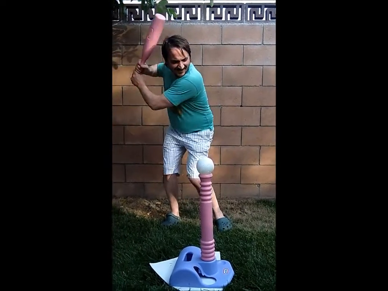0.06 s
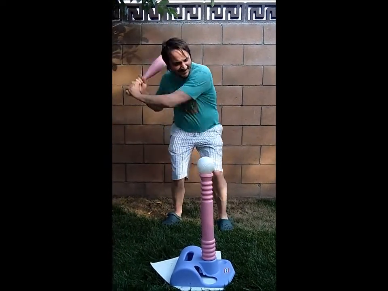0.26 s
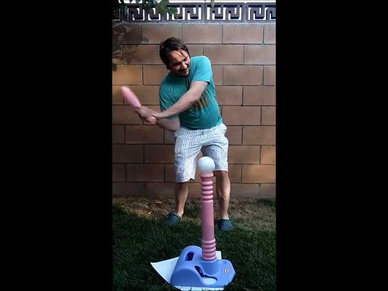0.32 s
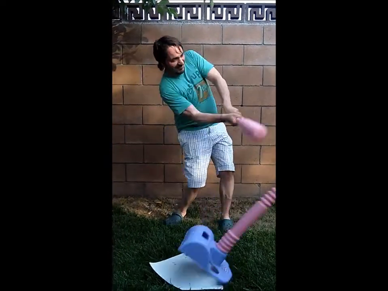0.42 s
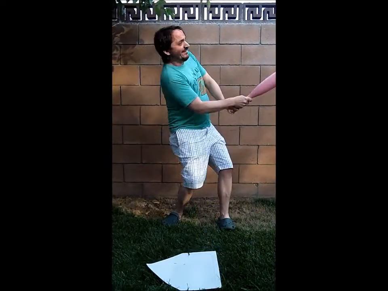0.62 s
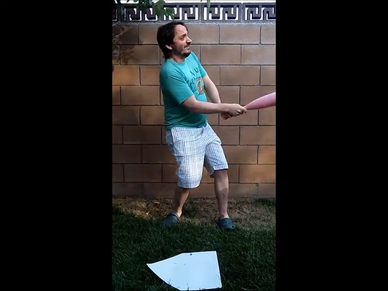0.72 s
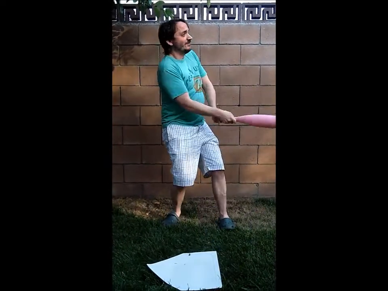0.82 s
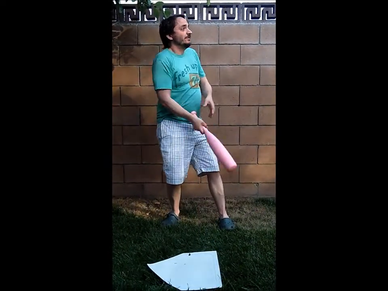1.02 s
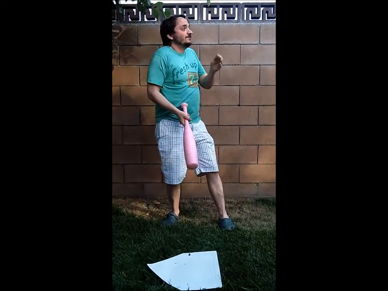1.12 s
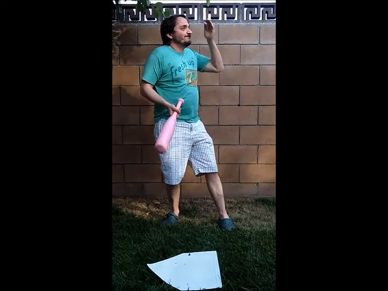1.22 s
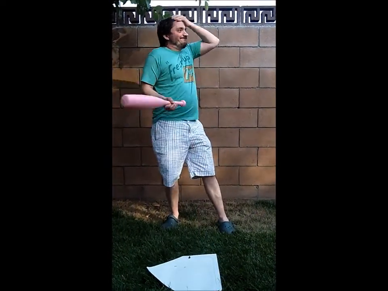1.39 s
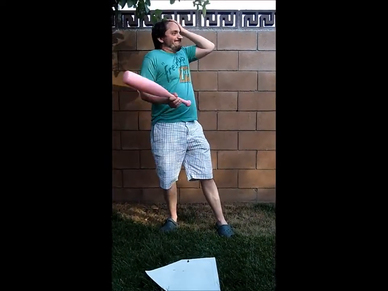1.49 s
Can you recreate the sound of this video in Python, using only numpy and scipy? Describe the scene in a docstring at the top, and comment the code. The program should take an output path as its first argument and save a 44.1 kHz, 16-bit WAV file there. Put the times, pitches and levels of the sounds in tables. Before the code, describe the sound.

One loud crack of a plastic bat hitting a ball and tee, over faint distant traffic.

```python
"""A walled backyard, distant town noise behind. The air of a swing buffets the microphone and the
recorder clicks faintly. A hollow plastic bat cracks into a ball and its tee; wall and houses answer.
The crack overloads the recorder, whose gain control ducks the town and lets it creep back.
Farther off, plastic clatters faintly as the struck things come down out of sight."""
import sys
import numpy as np
from scipy import signal
from scipy.fft import rfft, irfft
from scipy.io import wavfile
from scipy.ndimage import uniform_filter1d

SR = 44100
rng = np.random.default_rng(int(sys.argv[2]) if len(sys.argv) > 2 else 0)


def store_pcm(level_fs):
    """Save levels as 16-bit WAV."""
    pcm = np.round(np.clip(level_fs, -1, 1) * 32767).astype(np.int16)
    wavfile.write(sys.argv[1], SR, np.atleast_2d(pcm).T)


N = 68355
BAT_S = .409   # bat meets ball


def bat():
    """The blow sets the hollow bat ringing; its shell's dense small modes add a short bright snap."""
    # modes of the hollow bat: f/Hz, level/dB, t60/s
    modes = [(314, -18, .07), (500, -11, 0.039), (747, -6, .115), (1480, -11, 0.0703), (1757.1, -6, .06),
             (2120, -11, .05), (2667, -9, 0.044), (2800.2, -12, .035), (3258, -7.5, .035), (3765, -14, .03),
             (4185, -12, 0.034), (4433, -16, .03), (5070, -18, 0.029)]
    # spectrum of the snap: f/Hz, level/dB
    snap_colour = [(200, -8.5), (600, -1), (1500, -1), (3000, -1), (4500, -4), (6000, -8.5), (8000, -24),
                   (11000, -15), (16000, -28)]
    snap = from_db(-6) * noise(snap_colour) * dying(t60=.026)
    return through(contact(BAT_S, db=16.5, contact_s=.00006), ring(modes) + snap)


def tee():
    """The tee is knocked over: a lower, hollow knock just after the bat's."""
    # modes of the hollow tee: f/Hz, level/dB, t60/s
    modes = [(619.9, -15, .11), (1119.1, -4.5, .04), (1241.6, -6.5, 0.032), (1561, -19, 0.15),
             (2500, -21, .07)]
    return through(contact(.4134, db=18, contact_s=.00016), ring(modes))


def yard(crack):
    """The wall behind the batter answers once; near things scatter briefly, far houses faintly, longer."""
    # spectrum of the near echoes: f/Hz, level/dB
    near_colour = [(150, -12), (400, -2.5), (800, 0.5), (1500, 0.5), (3000, -4.5), (5000, -14.5),
                   (8000, -26), (11000, -31), (16000, -37.5)]
    # spectrum of the echoes off the houses: f/Hz, level/dB
    far_colour = [(150, -9), (700, -3), (1500, 1), (2800, 1.5), (5000, -12), (8000, -27), (16000, -39.5)]
    near = echoes(near_colour, db=6.5, t60=.173, build_s=.0073)
    far = echoes(far_colour, db=-14.5, t60=.6244, build_s=.03)
    wall = from_db(-17) * delayed(crack, .021)
    return wall + delayed(near + far, BAT_S)


def air():
    """Right at the microphone: low turbulence, and eddies that each push and swing back."""
    # strength of the moving air: t/s, level/dB
    strength = [(0, -39), (.19, -40), (0.269, -21.5), (0.337, -13.5), (.385, -14), (.405, -22.5),
                (.45, -11.5), (.52, -17), (.6, -22), (.8, -30), (.93, -36.5), (1.24, -35), (1.31, -26.5),
                (1.4, -35), (1.55, -34.5)]
    # spectrum of the turbulence: f/Hz, level/dB
    colour = [(20, -9.5), (40, -4), (70, 2), (140, -1.5), (220, -11.5), (350, -22), (600, -38), (1200, -58),
              (4000, -86)]
    # eddies that thump the microphone: t/s, level/dB, f/Hz
    eddies = [(0.041, -13.5, 109.7), (0.2833, -10.5, 223), (0.2922, 5.5, 217.7), (0.325, -1, 75),
              (.338, -4, 80), (.347, 1.5, 130), (0.3533, -4.5, 261), (.381, -2.5, 220), (.388, -3, 90),
              (0.4838, 8, 180), (.514, -0.5, 150.2), (.595, -2, 109.6), (.698, -4.5, 129.6), (.74, -8, 109),
              (.855, -7, 101), (.87, -8, 160), (1.072, -10.5, 108.8), (1.306, -5.5, 60)]
    damping_per_rad, onset_rad = .298, .7
    wind = from_db(np.interp(seconds(), *np.transpose(strength))) * noise(colour)
    for start, db, hz in eddies:
        phase = 2 * np.pi * hz * np.maximum(seconds() - start, 0)
        envelope = np.exp(-damping_per_rad * phase) * (1 - np.exp(-phase / onset_rad))
        wind += from_db(db) * np.sin(phase) * envelope
    return wind


def landings():
    """Plastic tumbles at a distance, each knock on another spot and with its own brief echo."""
    # knocks on landing: t/s, level/dB, contact time/s
    knocks = [(.664, -13, 0.0004), (.682, -19, .00022), (1.008, -32, .0001), (1.044, -30, 0.000175),
              (1.363, -13, 0.000227), (1.3751, -14.5, 0.000199), (1.388, -17.5, 0.000277),
              (1.4031, -18, 0.000243)]
    # spectrum of the knocked plastic: f/Hz, level/dB
    colour = [(120, -16), (270, 4), (500, -1), (800, 2), (1200, 2.5), (1800, 1.5), (3200, -8), (5000, -16),
              (9000, -21), (16000, -35.5)]
    decay = dying(t60=.02124) + from_db(-11) * dying(t60=.2)   # knock and echo
    return sum(through(contact(*knock), noise(colour) * decay) for knock in knocks)


def recorder_clicks():
    """Three faint clicks of the recorder."""
    # clicks: t/s, level/dB
    clicks = [(0.292, -26), (0.3077, -18.5), (0.35, -16.5)]
    return sum(contact(start, db, .00007) for start, db in clicks)


def town():
    """Far traffic swells a little at first, then holds nearly steady beside the hum of a machine."""
    # spectrum of the distant traffic: f/Hz, level/dB
    colour = [(30, -12), (120, 4), (250, 1), (450, 0), (800, -0.5), (1200, 1.5), (2000, -5.5), (3000, -15),
              (4500, -26), (7000, -36.5), (10000, -35.5), (16000, -38.5)]
    waver_db, rise_db, rise_s, hum_hz = .28, 3.5, .07, 232.2
    waver = noise([(1, 0), (4, 0), (20, -40), (200, -120)])   # slow, mostly under 4 Hz
    level_db = -34.5 + waver_db * waver - rise_db * np.exp(-seconds() / rise_s)
    hum = np.sqrt(2) * np.sin(2 * np.pi * hum_hz * seconds())
    return from_db(level_db) * noise(colour) + from_db(-40.5) * hum


def contact(start, db, contact_s):
    """One pulse; the longer it lasts, the duller it sounds."""
    age = np.maximum(seconds() - start, 0) * 2 * np.pi / contact_s
    push = age * np.exp(-age)
    return from_db(db) * push / push.sum()


def ring(modes):
    """Struck modes dying away."""
    return sum(from_db(db) * dying(t60) * np.sin(2 * np.pi * hz * seconds()) for hz, db, t60 in modes)


def echoes(colour, db, t60, build_s):
    """Scattered reflections that build up and die away."""
    build_up = 1 - np.exp(-(seconds() / build_s) ** 2)
    return from_db(db) * noise(colour) * dying(t60) * build_up


def noise(colour):
    """Noise of the given spectrum; rms 1."""
    hz, db = np.transpose(colour)
    bin_hz = np.maximum(np.arange(N // 2 + 1) * SR / N, 1)
    gain = from_db(np.interp(np.log(bin_hz), np.log(hz), db))
    x = irfft(rfft(rng.standard_normal(N)) * gain, N)
    return x / np.sqrt(np.mean(x ** 2) + 1e-20)


def dying(t60):
    """Falls 60 dB in t60 seconds."""
    return np.exp(-np.log(1000) * seconds() / t60)


def through(x, response):
    return signal.fftconvolve(x, response)[:N]


def delayed(x, delay_s):
    return np.interp(seconds() - delay_s, seconds(), x, left=0)


def from_db(db):
    return 10 ** (np.asarray(db) / 20)


def seconds():
    return np.arange(N) / SR


def scene():
    """The yard on one microphone, with the recorder's clicks."""
    crack = bat() + tee()
    return (crack + yard(crack) + landings() + air() + recorder_clicks() + town())[None]


def gain_control(x):
    """Level over the limit pulls the gain down within milliseconds; it recovers slowly."""
    limit_db, detector_s, attack_s, release_db_per_s = -8.5, .002, .003237, 7.5
    power = np.abs(uniform_filter1d(x ** 2, int(detector_s * SR)))
    over_db = np.maximum(10 * np.log10(power + 1e-18) - limit_db, 0)
    recovery_db = release_db_per_s * seconds()
    held_db = np.maximum.accumulate(over_db + recovery_db, axis=-1) - recovery_db
    pole = np.exp(-1 / (attack_s * SR))
    duck_db = signal.lfilter([1 - pole], [1, -pole], held_db[0])
    return x * from_db(-delayed(duck_db, detector_s / 2))


def record(dry):
    """The recorder: gain control, a trace of hiss, overload on the crack, and the top cut."""
    hiss = from_db(-73.5) * rng.standard_normal(N)
    x = gain_control(dry) + hiss
    clipped = x / (1 + x ** 4) ** .25   # rounds off toward full scale
    top_cut = signal.cheby2(12, 60, 17200, fs=SR, output="sos")   # 60 dB down from 17.2 kHz
    return signal.sosfilt(top_cut, clipped)


dry = scene()
out = record(dry)
store_pcm(out)
```